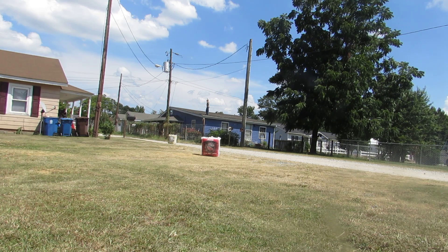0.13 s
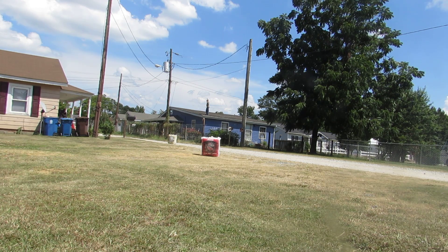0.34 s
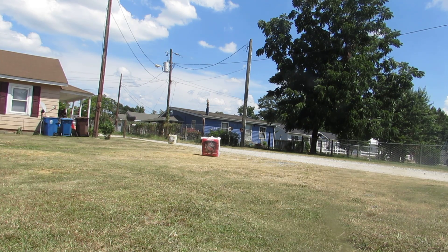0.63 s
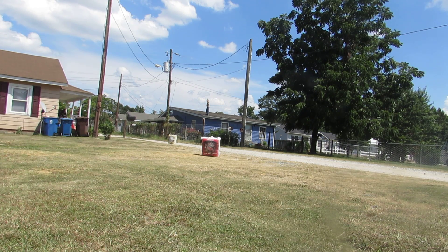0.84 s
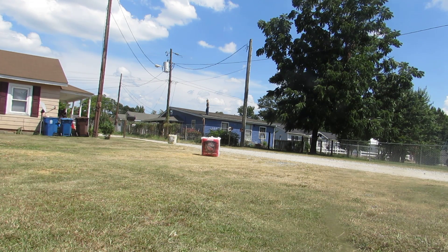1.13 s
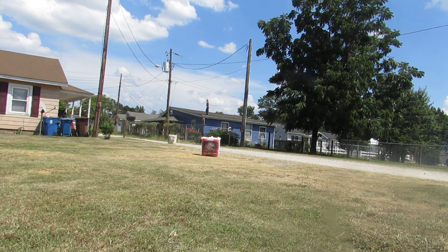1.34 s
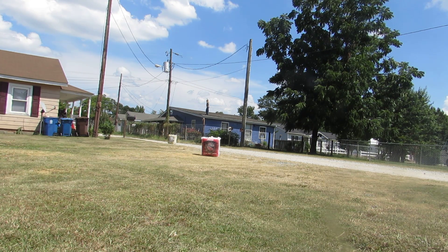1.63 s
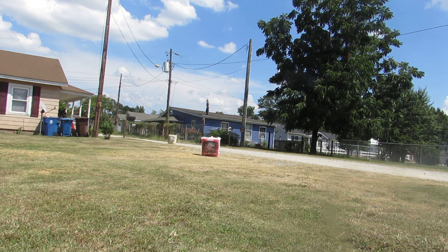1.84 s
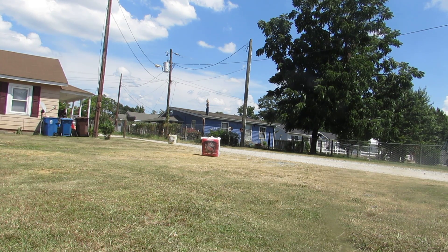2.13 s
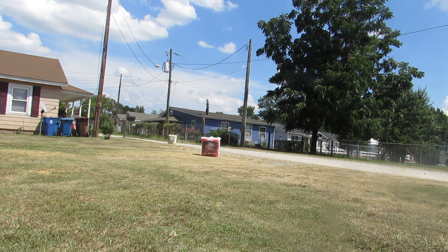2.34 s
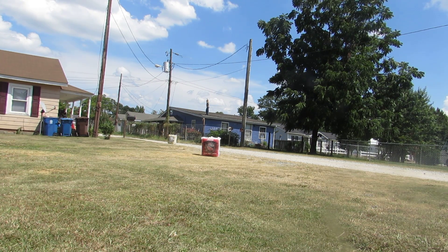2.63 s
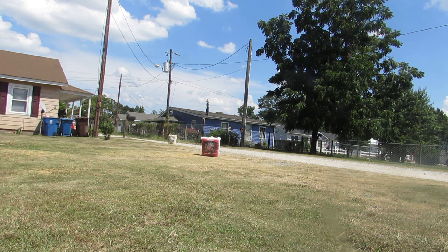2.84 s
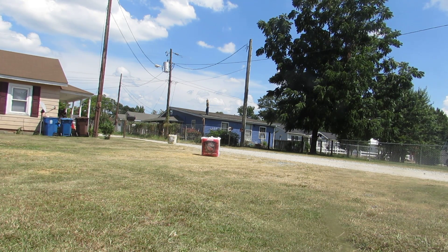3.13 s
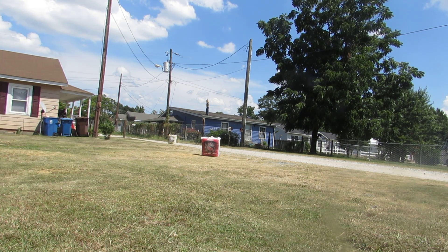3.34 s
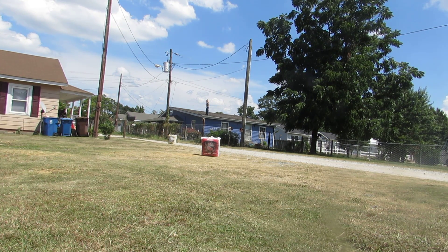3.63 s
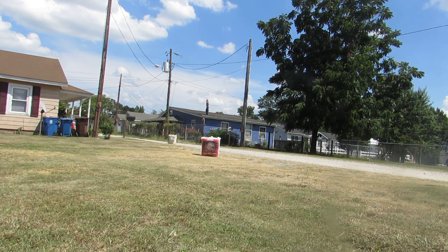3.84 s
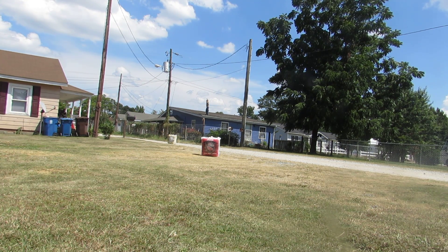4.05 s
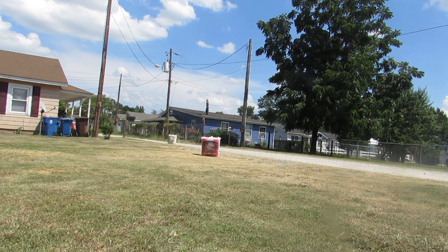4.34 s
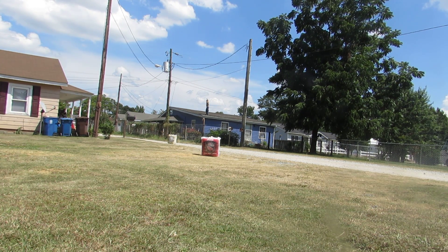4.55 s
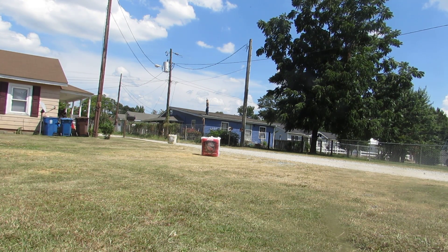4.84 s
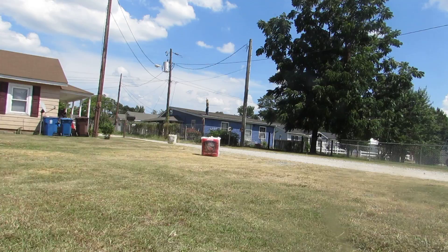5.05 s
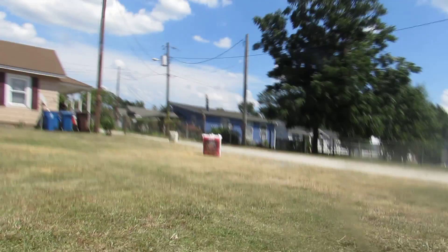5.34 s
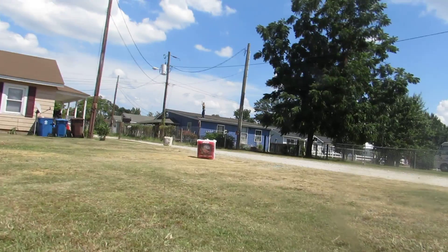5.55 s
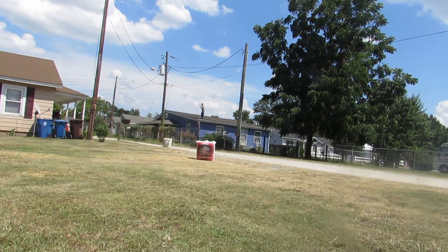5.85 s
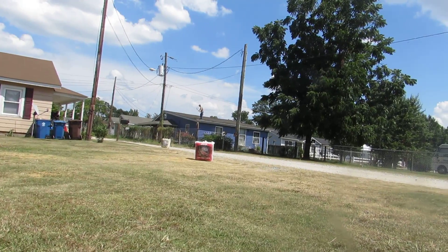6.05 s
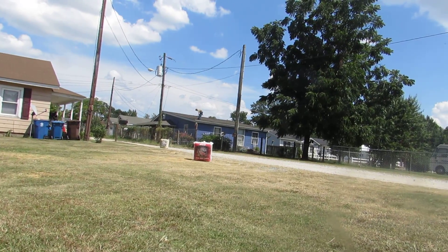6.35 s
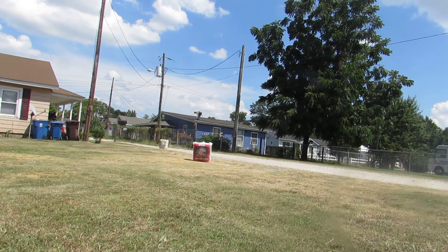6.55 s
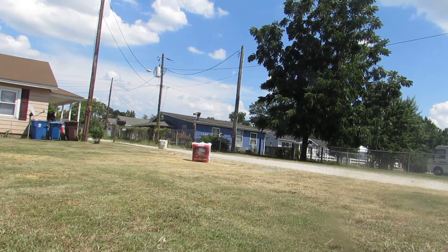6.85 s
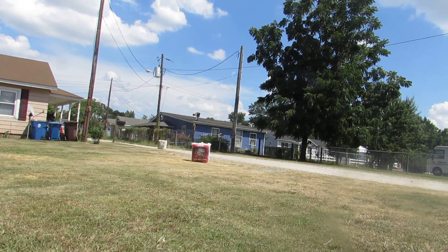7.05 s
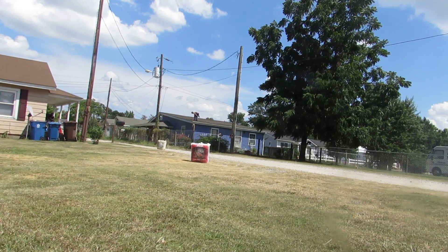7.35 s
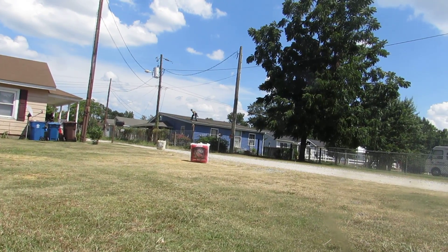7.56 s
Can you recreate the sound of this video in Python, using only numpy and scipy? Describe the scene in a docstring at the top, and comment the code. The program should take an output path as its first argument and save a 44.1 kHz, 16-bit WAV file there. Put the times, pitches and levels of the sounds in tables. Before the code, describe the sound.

In a windy yard with faint birds, a bow clicks and an arrow smacks sharply into a block target, its shaft rattling briefly.

```python
"""A sunny yard: wind buffets the microphone, a far machine drones, small birds call and thin high
tones slowly build to a shimmer. At 4.8 s a bow clicks some way off, and the arrow hisses closer.
At 5.25 s it smacks into a block target, which thuds and cracks; then the shaft rattles briefly.
The smack overloads the camera, whose gain control turns the yard down and slowly lets it back."""
import sys
import numpy as np
from scipy import signal
from scipy.fft import rfft, irfft
from scipy.io import wavfile

SR = 44100
rng = np.random.default_rng(int(sys.argv[2]) if len(sys.argv) > 2 else 0)


def unload_wav(signal):
    """Save mono or channel-first audio to the path in sys.argv[1] as 16-bit WAV at rate SR, clipped to [-1, 1]."""
    wavfile.write(
        sys.argv[1],
        SR,
        np.round(np.clip(np.atleast_2d(signal).T, -1, 1) * 32767).astype(np.int16),
    )


N = 339564
TIME = np.arange(N) / SR
FREQS = np.fft.rfftfreq(N, 1 / SR)
HIT_S = 5.254  # when the arrow lands

# The bow's clicks: peak_s, level_db, fade_s (a fade time is the time to drop by 60 dB)
BOW_CLICKS = [(4.8098, -37, .02), (4.8125, -24.5, 0.0065), (4.813, -35.5, 0.081), (4.8197, -34, .01),
              (4.824, -40.5, 0.45), (4.8755, -45, .012)]
# How far the block's sharp sounds lean to the left: pitch_hz, left_minus_right_db
BLOCK_LEAN = [(300, 4), (2000, 0), (5500, 1), (7000, 3), (11000, 4), (12000, 6), (15000, 4)]


def gain_of(db):
    """Turns decibels into a number to multiply a sound by."""
    return 10 ** (np.asarray(db) / 20)


def evened(x):
    """Scales a signal so that its average size (rms) is 1."""
    return x / np.sqrt(np.mean(x ** 2) + 1e-20)


def at_pitch(points, hz):
    """Looks up a value by pitch, sliding smoothly between a table's rows."""
    pitches, values = np.transpose(points)
    return np.interp(np.log(hz + 1), np.log(pitches + 1), values)


def level(curve):
    """Turns rows of time_s, level_db into a gain for every sample."""
    return gain_of(np.interp(TIME, *np.transpose(curve)))


def wander(hz):
    """A random wobble of average size 1, moving about hz times a second."""
    return evened(irfft(rfft(rng.standard_normal(N)) * np.exp(-(FREQS / hz) ** 2), N))


def noise(colour, tilt_db=0, diffuse=1, lean=None):
    """Stereo noise with a tone colour; a near source is less diffuse, so more alike on both sides."""
    # How alike the two microphones hear diffuse sound: pitch_hz, likeness (0 to 1)
    likeness = [(30, .99), (110, .985), (200, .92), (380, .55), (700, .52), (1290, .78), (2380, .85),
                (4400, .75), (8100, .45), (15000, .33)]
    # The yard's balance: pitch_hz, left_minus_right_db
    yard_lean = [(60, 0.1), (200, 0.5), (380, 1.3), (700, -1.5), (1300, -2.5), (2400, -0.5), (4400, -.5),
                 (15000, -1)]
    common, apart = rfft(rng.standard_normal((2, N)))
    same = np.clip(1 - diffuse * (1 - at_pitch(likeness, FREQS)), 0, 1)
    pair = np.sqrt(1 + same) * common + np.sqrt(1 - same) * np.array([apart, -apart])
    lean_db = at_pitch(yard_lean if lean is None else lean, FREQS)
    sides = gain_of(np.outer([.5, -.5], lean_db))
    shape = gain_of(at_pitch(colour, FREQS) + tilt_db * np.log2(FREQS + 1))  # tilt is per octave
    return evened(irfft(pair * sides * shape, N))


def burst(peak_s, rise_s, fade_s):
    """A loudness shape that swells to a peak and then dies away."""
    return np.exp(np.minimum((TIME - peak_s) / rise_s, (peak_s - TIME) * np.log(1000) / fade_s))


def push(peak_s, width_s):
    """A smooth pulse of force whose samples add up to 1."""
    force = np.exp(-.5 * ((TIME - peak_s) / width_s) ** 2)
    return force / force.sum()


def yard_echo(sound, fade_s, echo_db):
    """Adds the sound that scatters back from trees and walls."""
    t = np.arange(SR // 2) / SR
    tail = rng.standard_normal((2, len(t))) * np.exp(-np.log(1000) * t / fade_s)
    echo = signal.oaconvolve(sound[None], tail / np.linalg.norm(tail[0]), axes=1)[:, :N]
    return sound + gain_of(echo_db) * echo


def lull():
    """A gain that dips briefly where the low wind and the hum let up."""
    # The dips: middle_s, depth_db, half_length_s
    dips = [(1.216, 8, 0.07), (6.91, 5, 0.11)]
    return gain_of(-sum(db * np.exp(-((TIME - s) / half) ** 4) for s, db, half in dips))


def wind(lump_db=2, lump_hz=8.8):
    """A lumpy low roar, the smooth rush of the trees, and deep buffets of air on the microphone."""
    # Tone colours of the roar, the trees and the buffets: pitch_hz, relative_db
    roar_colour = [(40, -33), (100, -8), (135, 1), (190, -3), (240, -7), (320, -13), (600, -31),
                   (2000, -59)]
    rush_colour = [(20, -36), (200, 0), (430, -0.5), (680, -1), (1000, -0.5), (1400, -4.5), (2000, -11.5),
                   (3000, -17.5), (5000, -21), (8000, -24), (11000, -30.5), (15500, -33.5)]
    buffet_colour = [(15, -36), (28, -16), (50, -1.5), (80, -1.5), (100, -4.5), (130, -7), (200, -25),
                     (600, -49), (2000, -80)]
    # How each of them rises and falls: time_s, relative_db
    roar_levels = [(0.0, -46.0), (2.7, -44.0), (4.1, -44.5), (4.7, -45.5), (6.7, -46.5), (7.0, -44),
                   (7.7, -45.5)]
    rush_levels = [(0, -46), (.9, -47), (3.1, -45.5), (3.9, -46), (5.2, -47.5), (5.5, -48.8), (6.1, -46.5),
                   (6.8, -47.5), (7.7, -48)]
    buffet_levels = [(0.0, -40.5), (0.5, -45), (0.9, -38), (1.6, -37.5), (3.0, -47), (3.5, -41), (4.3, -43),
                     (5.2, -42.5), (5.4, -44.5), (6.4, -44), (7.3, -44.5), (7.7, -46.0)]
    roar = evened(noise(roar_colour) * gain_of(1.3 * wander(hz=12))) * level(roar_levels)
    rush = noise(rush_colour) * level(rush_levels) * gain_of(0.49 * wander(hz=7.1))
    buffets = evened(noise(buffet_colour) * gain_of(lump_db * wander(lump_hz))) * level(buffet_levels)
    return lull() * (gain_of(0.86) * buffets + gain_of(1.57) * roar) + rush


def hum_and_whines(hum_hz=116.2, waver=0.34, throb_db=1.8, throb_hz=3.7, pulse_hz=13.4):
    """A far machine's wavering hum, a faint steady tone, and the camera's own thin, pulsing whine."""
    # The tones in the hum: multiple_of_hum, relative_db
    hum_tones = [(.5, -12), (1, 2), (2, -17.5)]
    # How the hum rises and falls: time_s, relative_db
    hum_levels = [(0.0, -38.5), (0.4, -44.5), (0.6, -36.5), (1.3, -42), (1.6, -35.5), (1.9, -36.5),
                  (2.6, -36.5), (2.9, -35.5), (3.15, -39.5), (3.4, -35.5), (3.7, -39.5), (4.6, -39),
                  (5.4, -41.5), (6.8, -41), (7.0, -46), (7.7, -42.5)]
    # The steady tone and the camera's whine: pitch_hz, level_db, pulse_depth (0 to 1)
    whine_tones = [(1400, -65, 0), (15734, -75.5, .5)]
    phase = 2 * np.pi * hum_hz * TIME + 0.82 * wander(hz=6.4)
    tones = sum(gain_of(db) * np.sin(multiple * phase) for multiple, db in hum_tones)
    hum = evened((1 + waver * wander(hz=10)) * gain_of(throb_db * wander(throb_hz)) * tones)
    pulse = np.sin(2 * np.pi * pulse_hz * TIME)
    whines = sum(gain_of(db) * evened((1 + depth * pulse) * np.sin(2 * np.pi * hz * TIME))
                 for hz, db, depth in whine_tones)
    return gain_of(-0.1) * level(hum_levels) * lull() * hum + whines


def shimmer(count=1000, spread=1.05, faint_s=0.54, scatter_db=2, flutter=.12, jitter=0.26):
    """Thin high tones swell, flutter and fade: a few clear ones over many that melt into hiss."""
    # Tone colour of the bed of faint tones and hiss: pitch_hz, relative_db
    bed_colour = [(2000, -25), (3800, -6), (4500, -5.5), (5300, -4), (6000, -1), (6900, -3), (8000, -2),
                  (8600, -2.5), (9600, -7.5), (10500, -12.5), (15500, -14)]
    # How that bed grows: time_s, relative_db
    bed_levels = [(0, -77), (1.8, -71.5), (2.8, -65.5), (3.6, -62), (4.3, -61), (4.9, -57.5), (5.6, -59.5),
                  (6.3, -59), (7.1, -57.5), (7.7, -57.5)]
    # The clear tones: peak_s, length_s, pitch_hz, level_db
    clear_tones = [(2.9, 1.8, 4470, -72), (3, 1.8, 3910, -72), (3.4, 2.8, 5330, -68.5),
                   (4.4, 1.8, 6500, -76), (4.4, 1.8, 7030, -74), (4.5, 1.4, 8490, -67),
                   (4.6, 1.4, 8030, -71.5), (4.7, 1.9, 6010, -65.5), (4.7, 2.1, 6160, -66),
                   (4.7, 1.1, 4440, -69), (4.9, 1.8, 7500, -69), (5.1, .9, 7900, -66), (5.7, 1, 5820, -64),
                   (5.7, 1.3, 5945, -66), (5.8, 1, 7547, -66), (5.9, 1.4, 8030, -68), (6, 1.2, 8527, -70),
                   (6.1, 2.2, 7080, -64), (6.4, 1.4, 6590, -67), (6.5, 1.6, 4420, -66.5),
                   (6.5, 1.5, 9025, -69), (6.6, 1.8, 6300, -67), (7.1, 1.3, 5930, -68),
                   (7.1, 1.1, 6836, -63.5), (7.3, 1.7, 3980, -72), (7.4, .9, 6363, -69),
                   (7.4, 1, 7300, -71), (7.5, 1.1, 3880, -69), (7.5, 1.3, 4489, -72), (7.5, 1.3, 7827, -70),
                   (7.6, .9, 4403, -69), (7.6, 0.79, 5383, -68)]
    shiver = wander(hz=21.7)

    def add_tone(mix, peak_s, length_s, hz, db, side, lag):
        """Adds one shivering tone, placed left or right."""
        start, end = int((peak_s - length_s / 2) * SR), int((peak_s + length_s / 2) * SR)
        span = np.arange(max(start, 0), min(end, N))
        shifted = span + int(lag * N)  # each tone gets its own stretch of the shiver
        swell = np.cos(np.pi * (TIME[span] - peak_s) / length_s) ** 2
        swell *= 1 + flutter * shiver[-shifted % N]
        phase = 2 * np.pi * hz * TIME[span] + jitter * shiver[shifted % N]
        tone = np.sqrt(2) * gain_of(db) * swell * np.sin(phase)
        mix[:, span] += np.outer(1 + spread * (side - .5) * np.array([1, -1]), tone)

    faint, clear = np.zeros((2, 2, N))
    for k, (pitch, length, size, side, lag) in enumerate(rng.random((count, 5))):
        hz = 3850 + 6700 * pitch
        db = at_pitch(bed_colour, hz) + scatter_db * (2 * size - 1)
        add_tone(faint, TIME[-1] * k / count, faint_s * (.5 + length), hz, db, side, lag)
    for row in clear_tones:
        add_tone(clear, *row, side=rng.random(), lag=rng.random())
    bed = gain_of(-1.5) * evened(faint) + gain_of(-4) * noise(bed_colour)
    return bed * level(bed_levels) + clear


def birds():
    """Short sliding calls, clear or raspy, that linger among the trees."""
    # The calls: start_s, length_s, start_hz, end_hz, relative_db, rasp_hz
    calls = [(1.018, 0.03, 9000, 8470, -55.5, 70), (1.037, 0.025, 8100, 7900, -51, 70),
             (2.16, .028, 9050, 8440, -58, 70), (2.179, .02, 8100, 7850, -52, 70),
             (3.266, .028, 8030, 7920, -47, 50), (3.26, 0.028, 9940, 9940, -57, 70),
             (3.68, 0.038, 6380, 5830, -53, 90), (5.408, .055, 6450, 5820, -55, 90),
             (5.942, .061, 6640, 5630, -55.5, 110), (6.612, 0.13, 2450, 2400, -57, 210),
             (6.645, .04, 3450, 3400, -69, 150), (6.68, .025, 2400, 2600, -56, 60),
             (7.656, .043, 6360, 6130, -53.5, 110)]
    song, rasp = np.zeros(N), wander(hz=400)
    for start_s, length_s, start_hz, end_hz, db, rasp_hz in calls:
        span = (TIME > start_s) & (TIME < start_s + length_s)
        progress = (TIME[span] - start_s) / length_s
        hz = start_hz + (end_hz - start_hz) * progress + rasp_hz * rasp[span]
        swell = 2 * gain_of(db) * np.sin(np.pi * progress)
        song[span] += swell * np.sin(2 * np.pi * np.cumsum(hz) / SR)
    return gain_of(-6.5) * yard_echo(song, fade_s=0.43, echo_db=2)


def air_bumps():
    """Single shoves of air, each a slow swing or two of pressure."""
    # The shoves: middle_s, pitch_hz, level_db, width_s
    shoves = [(1.105, 81, -26, 0.0078), (1.321, 60, -29.5, 0.012), (3.855, 110, -37, 0.0043),
              (3.884, 75, -28, 0.01), (4.785, 62, -22, 0.0069), (4.829, 95, -23, 0.0061),
              (5.473, 65, -24.5, 0.0074)]
    pressure = np.zeros(N)
    for middle_s, hz, db, width_s in shoves:
        t = TIME - middle_s
        pressure -= gain_of(db) * np.exp(-.5 * (t / width_s) ** 2) * np.sin(2 * np.pi * hz * t)
    return pressure


def bow(knock_hz=480, knock_db=-26, ring_hz=5200, ring_db=-50):
    """The string is let go and stops: dry clicks, a dull knock, and a small part that rings briefly."""
    # Tone colour of the clicks: pitch_hz, relative_db
    click_colour = [(100, 14.5), (700, 5.5), (1500, -1.5), (2600, -9.5), (5200, -7), (8500, -10),
                    (10200, -8.5), (12000, -14), (16000, -19)]
    click_shape = sum(gain_of(db) * burst(s, 0.00032, fade_s) for s, db, fade_s in BOW_CLICKS)
    clicks = noise(click_colour, diffuse=0.35) * click_shape
    stop_s = BOW_CLICKS[1][0]
    knock = burst(stop_s, rise_s=.0005, fade_s=.012) * np.sin(2 * np.pi * knock_hz * (TIME - stop_s))
    ring_phase = 2 * np.pi * ring_hz * TIME + 2 * wander(hz=90)
    ring = burst(4.828, rise_s=.005, fade_s=.22) * np.sin(ring_phase)
    return clicks + gain_of(knock_db) * knock + gain_of(ring_db) * ring


def arrow_flight(near_s=0.018, hiss_db=-34.5):
    """The arrow's vanes hiss, twice as strong at half the distance, until it lands."""
    # Tone colour of the hiss: pitch_hz, relative_db
    hiss_colour = [(200, -5), (1500, 2), (4000, -2), (9000, 1), (13000, -2), (16000, -3)]
    release_s = BOW_CLICKS[0][0]
    to_go_s = HIT_S - TIME
    fade_in = np.clip((TIME - release_s) / (HIT_S - release_s), 0, 1)
    nearness = near_s / (near_s + abs(to_go_s))
    return gain_of(hiss_db) * noise(hiss_colour) * fade_in * nearness * (to_go_s > 0)


def block_thud():
    """The point presses on the face, which gives way; the filling drags it to a stop. The block booms."""
    # The block's own notes: pitch_hz, relative_db, fade_s
    notes = [(138, 14.5, 0.029), (226, 5, 0.035), (403, -11, .046), (442, -7.5, 0.044), (807, -.5, .017)]
    t = np.arange(SR // 5) / SR
    ring = sum(gain_of(db) * np.sin(2 * np.pi * hz * t) * np.exp(-np.log(1000) * t / fade_s)
               for hz, db, fade_s in notes)
    press = push(HIT_S, width_s=.00073)
    give_way = 1.045 * push(HIT_S, width_s=.00028)
    drag = .28 * push(HIT_S + .0044, width_s=.0034)
    stop = .22 * push(HIT_S + .0054, width_s=.00028)
    boom = signal.oaconvolve(press - give_way + drag - stop, ring)[:N]
    return boom * gain_of([[.8], [0]])  # a little louder on the left


def block_crack(crack_db=-7, crunch_db=-26):
    """The block's skin cracks, and the filling crunches on more dully."""
    # Tone colour of the crack: pitch_hz, relative_db
    colour = [(300, -6), (1150, -19), (1500, 8.5), (1800, -8), (2200, 8), (2850, 1.5), (3120, -3),
              (3350, 2), (3980, 5.5), (4350, 1), (4700, 3), (5400, -14), (6000, -0.5), (6350, -2),
              (7250, -2.5), (8400, -5), (9200, -12), (9700, -5), (10500, -17), (11100, 0.5), (12200, -12),
              (12700, -11), (16000, -14)]
    skin = noise(colour, diffuse=.2, lean=BLOCK_LEAN) * burst(5.2547, rise_s=.00094, fade_s=.0075)
    filling = noise(colour, tilt_db=-4, diffuse=.3) * burst(5.2565, rise_s=.0024, fade_s=.033)
    return gain_of(crack_db) * skin + gain_of(crunch_db) * filling


def shaft_rattle():
    """The stuck arrow whips to and fro and rattles at each swing."""
    # Tone colours of a dull slap and a hard, bright one: pitch_hz, relative_db
    dull_colour = [(200, 5), (700, -1.5), (1050, -2.5), (1800, -2.5), (2250, -6), (2500, 2.5), (2800, 1.5),
                   (3200, -8.5), (5500, -11), (7200, -13), (10000, -20), (16000, -34)]
    bright_colour = [(300, -4), (2100, -7), (2750, 6), (3400, -3), (4350, 1), (5200, -10), (7000, 8),
                     (8600, -6), (10200, -1), (11200, -9), (12400, -7), (13400, -10), (16000, -14)]
    # The shaft's slaps: peak_s, level_db, rise_s, fade_s, brightness (0 to 1)
    slaps = [(5.2819, -40, .0005, .006, .97), (5.2869, -16.5, .0001, 0.009, 0.88),
             (5.289, -31.5, .0006, 0.044, 0.02), (5.301, -32, .0006, .018, 0.1),
             (5.3094, -24.5, 0.0017, 0.036, 0.01), (5.331, -30, 0.0036, 0.038, 0),
             (5.35, -25, 0.0021, 0.051, 0.15), (5.3594, -23, 0.00091, 0.012, 0.02)]
    dull, bright = noise(dull_colour), noise(bright_colour, lean=BLOCK_LEAN)
    rattle = np.zeros((2, N))
    for peak_s, db, rise_s, fade_s, brightness in slaps:
        blend = np.sqrt(1 - brightness) * dull + np.sqrt(brightness) * bright
        rattle += gain_of(db) * burst(peak_s, rise_s, fade_s) * blend
    return rattle


def scene():
    """The background sounds, with the shot on top."""
    background = wind() + hum_and_whines() + shimmer() + birds() + air_bumps()
    return background + bow() + arrow_flight() + block_thud() + block_crack() + shaft_rattle()


def record(dry, threshold_db=-10, recover_db_per_s=6, attack_s=0.016, top_hz=15900):
    """The camera flattens overloads, turns down after a peak, creeps back, and cuts the top treble."""
    clipped = np.clip(dry, -1, 1)
    peak_db = 20 * np.log10(abs(clipped).max(0) + 1e-9)
    recovery_db = recover_db_per_s * TIME
    held_db = np.maximum.accumulate(peak_db + recovery_db) - recovery_db  # each peak sinks slowly
    over_db = np.maximum(held_db - threshold_db, 0)
    carry = np.exp(-1 / (attack_s * SR))
    cut_db = signal.lfilter([(1 - carry) ** 2], [1, -2 * carry, carry ** 2], over_db)  # eases in
    treble_cut = signal.firwin(511, top_hz, window=("kaiser", 9), fs=SR)
    return signal.oaconvolve(clipped / gain_of(cut_db), treble_cut[None], "same")


dry = scene()
out = record(dry)
unload_wav(out)
```